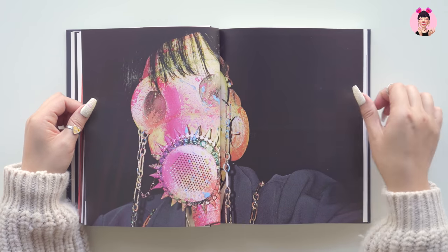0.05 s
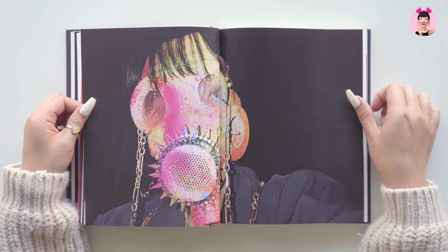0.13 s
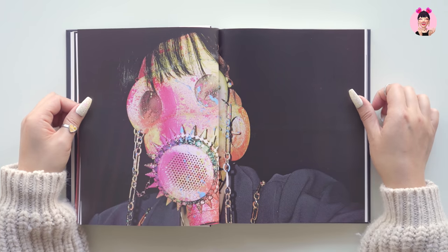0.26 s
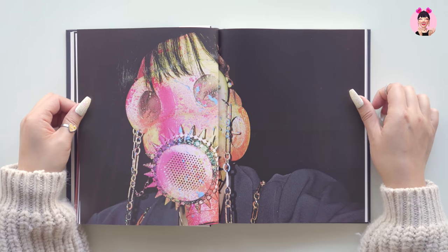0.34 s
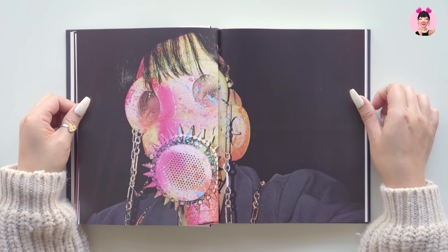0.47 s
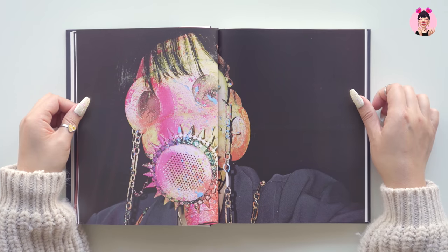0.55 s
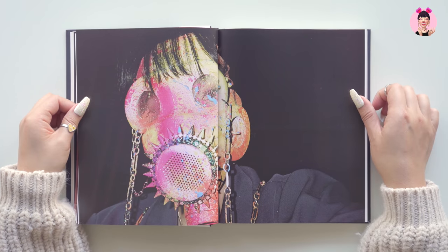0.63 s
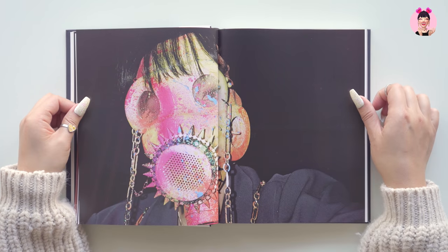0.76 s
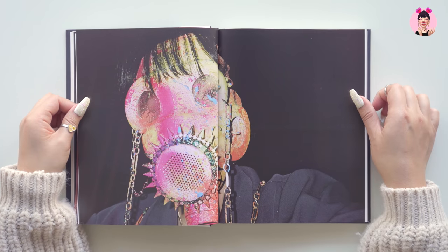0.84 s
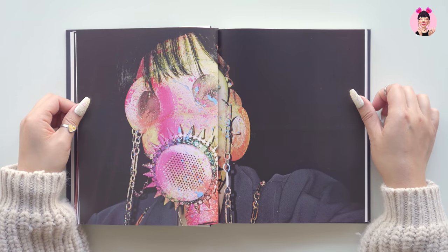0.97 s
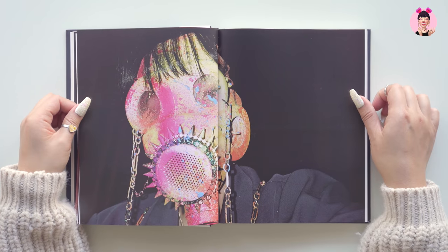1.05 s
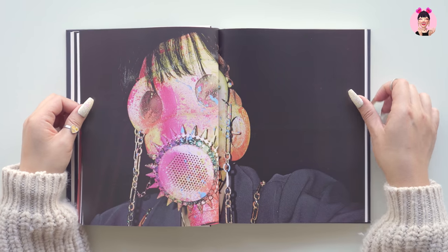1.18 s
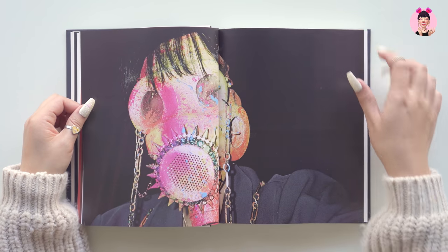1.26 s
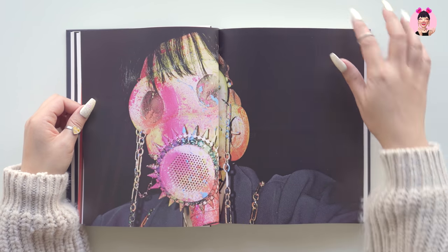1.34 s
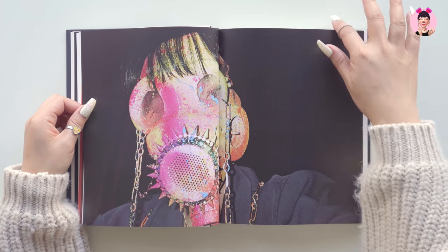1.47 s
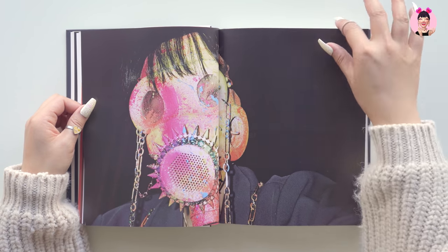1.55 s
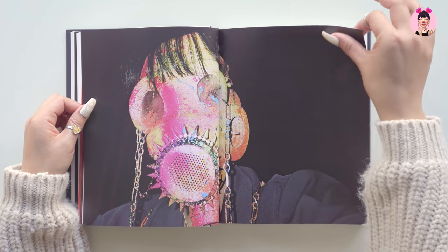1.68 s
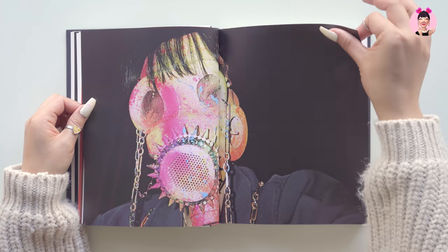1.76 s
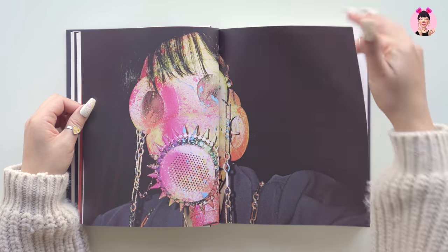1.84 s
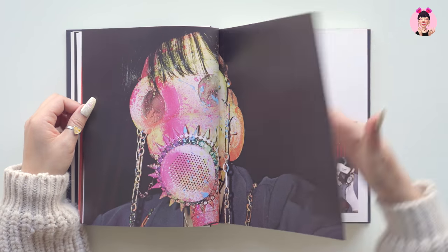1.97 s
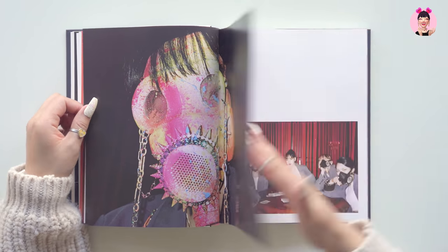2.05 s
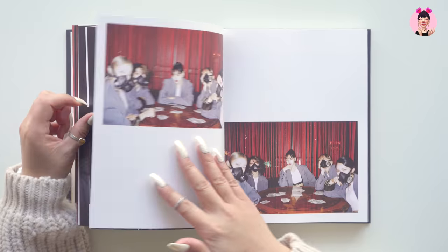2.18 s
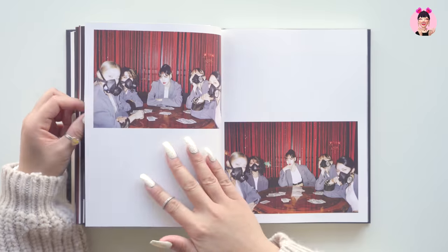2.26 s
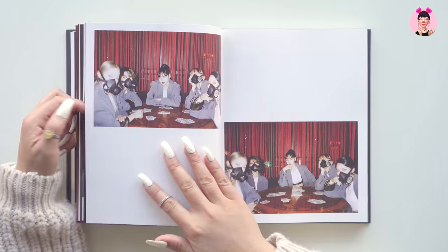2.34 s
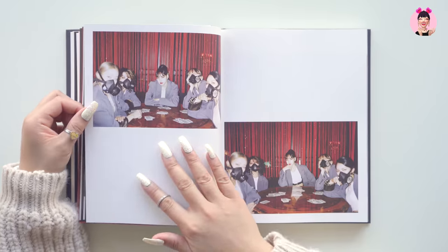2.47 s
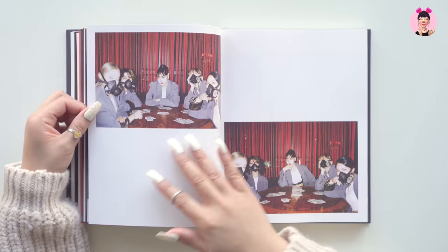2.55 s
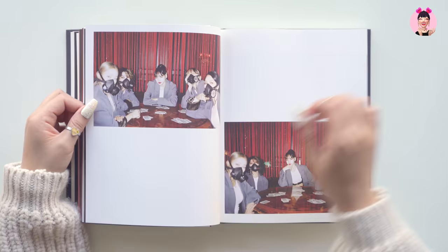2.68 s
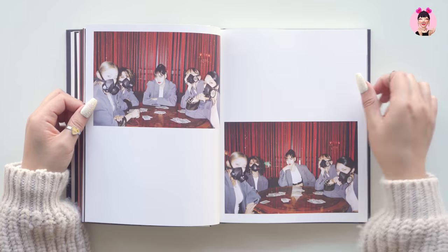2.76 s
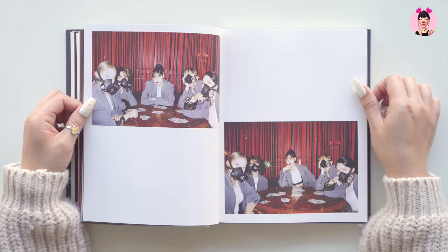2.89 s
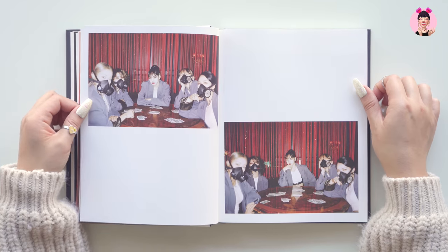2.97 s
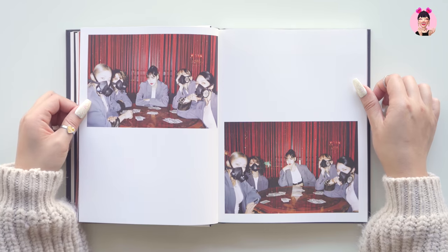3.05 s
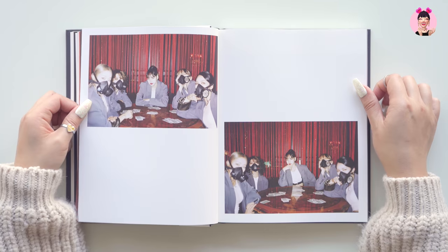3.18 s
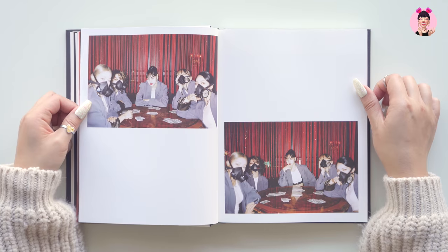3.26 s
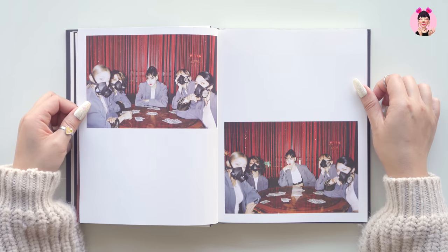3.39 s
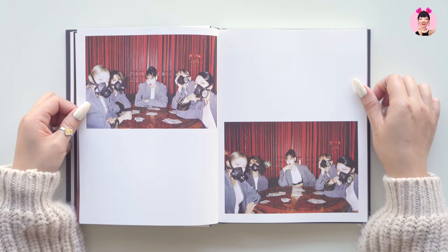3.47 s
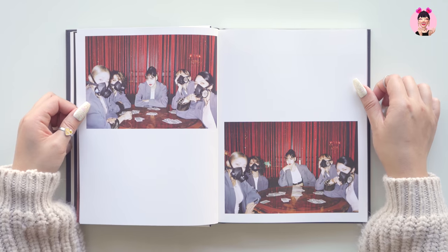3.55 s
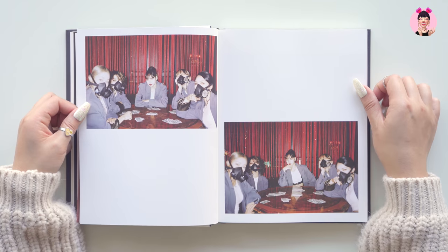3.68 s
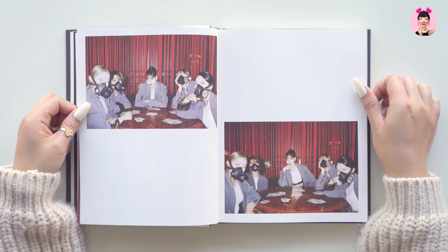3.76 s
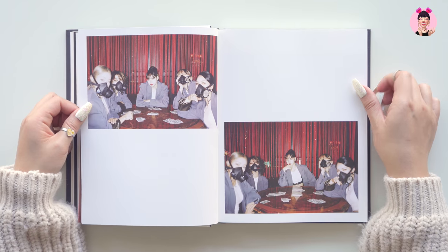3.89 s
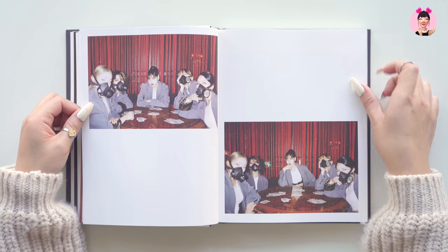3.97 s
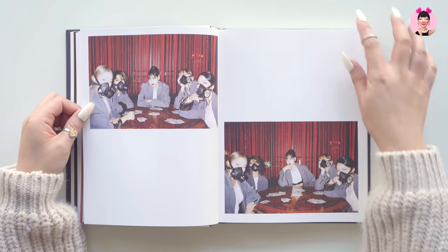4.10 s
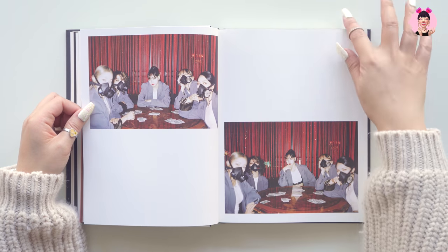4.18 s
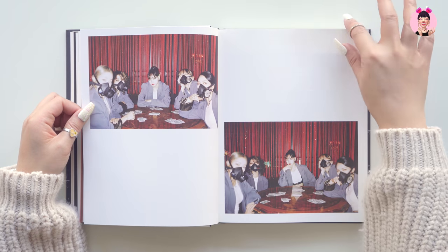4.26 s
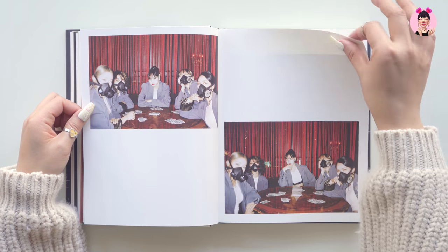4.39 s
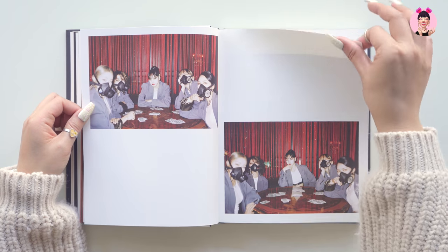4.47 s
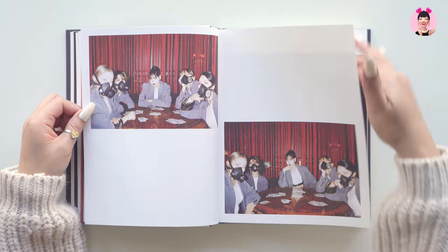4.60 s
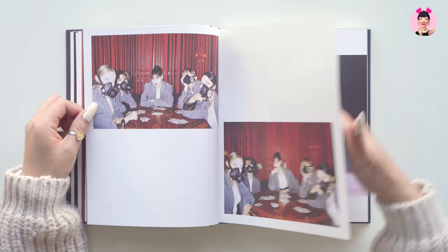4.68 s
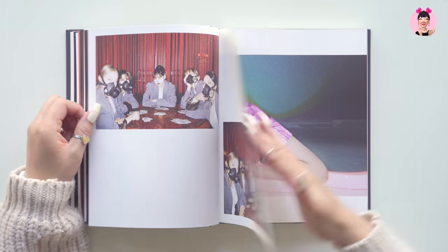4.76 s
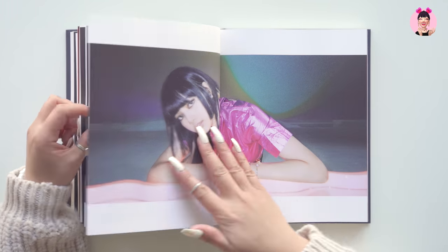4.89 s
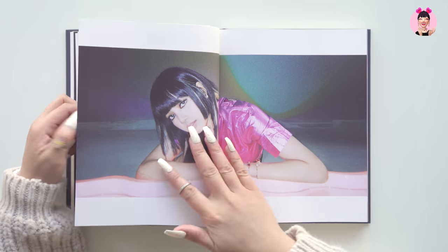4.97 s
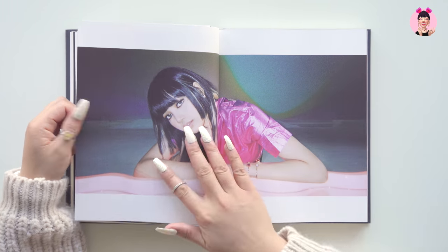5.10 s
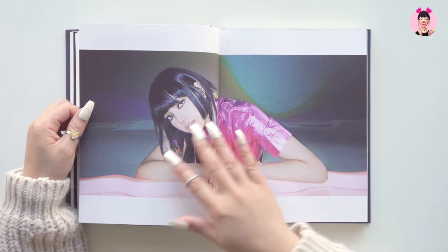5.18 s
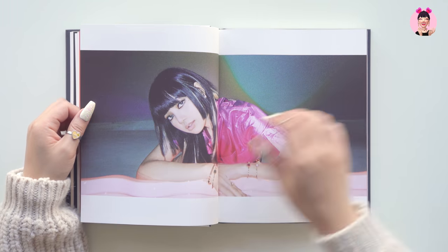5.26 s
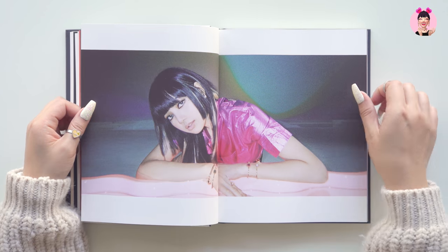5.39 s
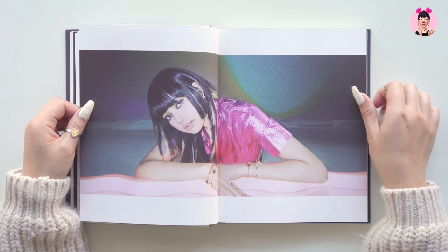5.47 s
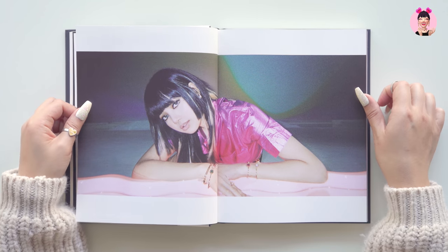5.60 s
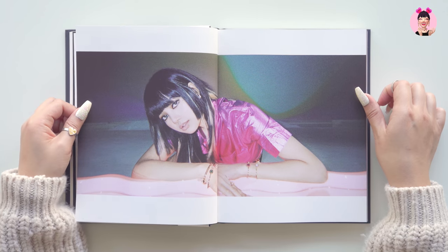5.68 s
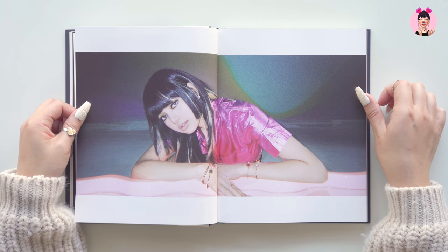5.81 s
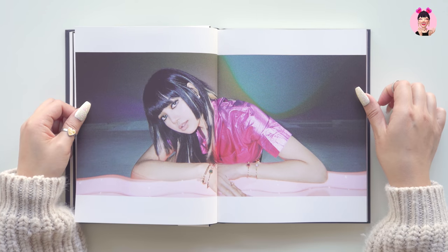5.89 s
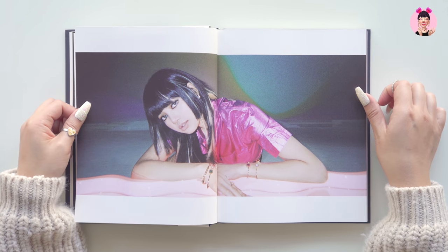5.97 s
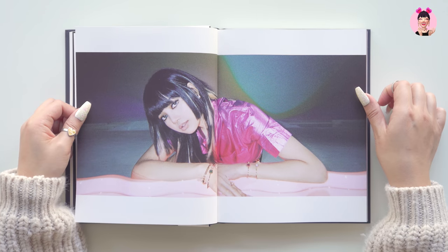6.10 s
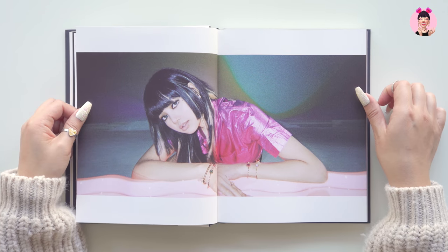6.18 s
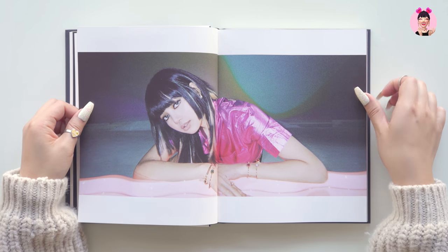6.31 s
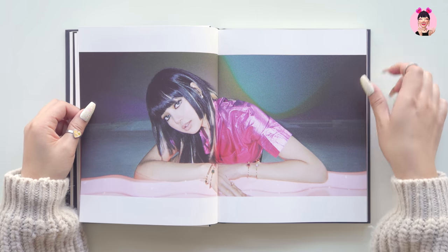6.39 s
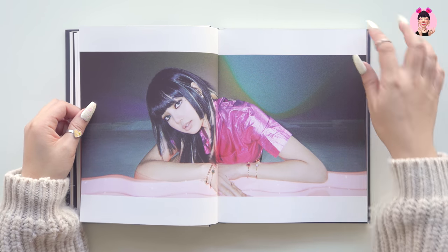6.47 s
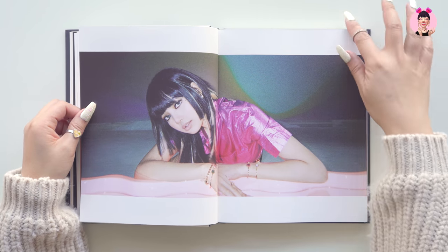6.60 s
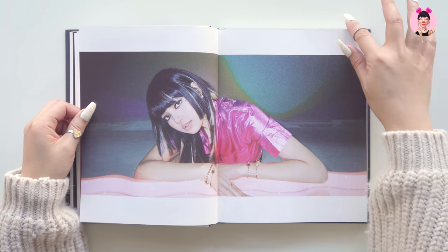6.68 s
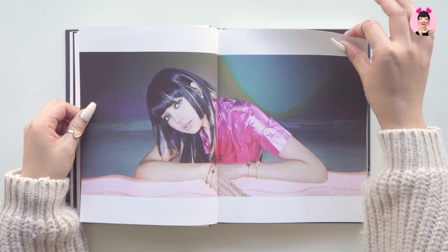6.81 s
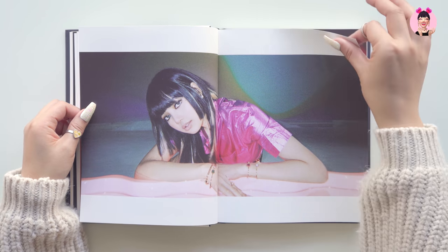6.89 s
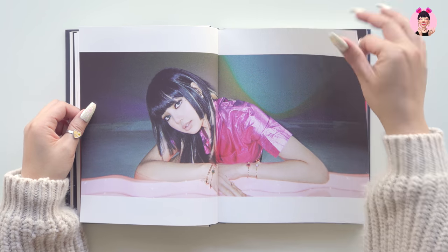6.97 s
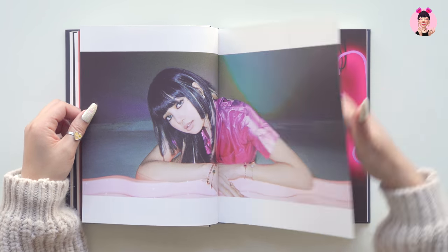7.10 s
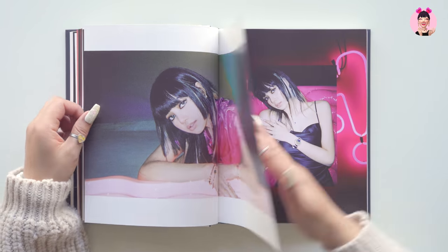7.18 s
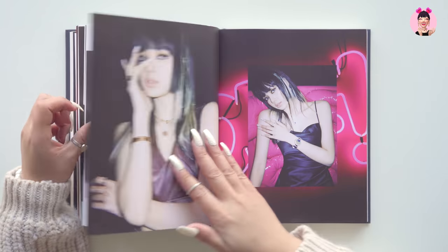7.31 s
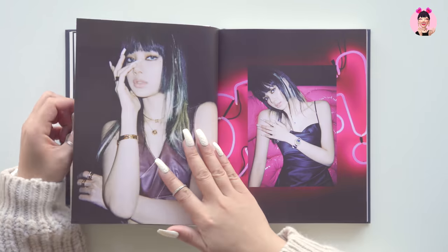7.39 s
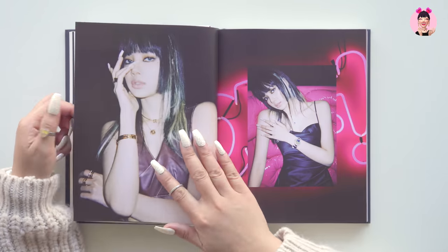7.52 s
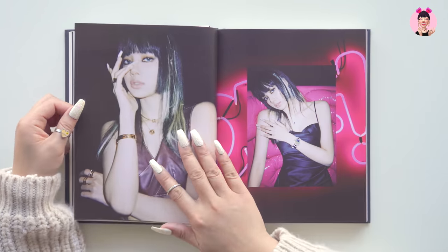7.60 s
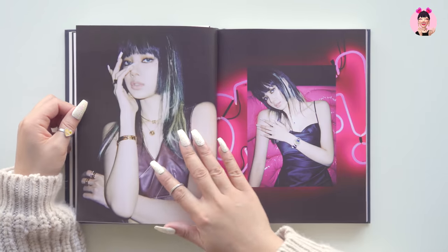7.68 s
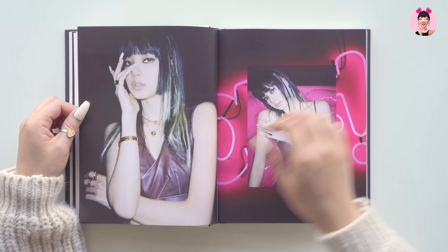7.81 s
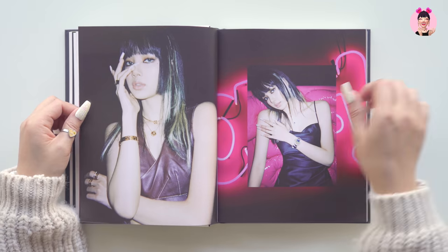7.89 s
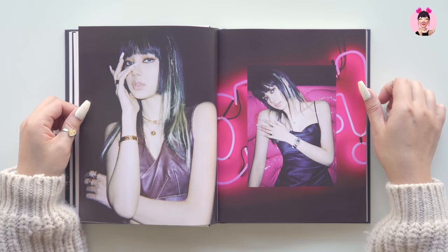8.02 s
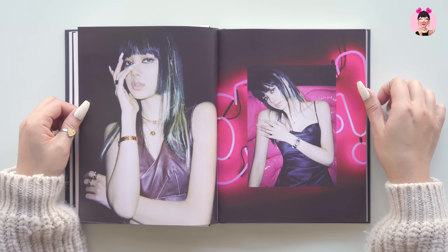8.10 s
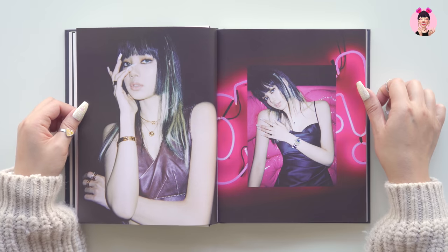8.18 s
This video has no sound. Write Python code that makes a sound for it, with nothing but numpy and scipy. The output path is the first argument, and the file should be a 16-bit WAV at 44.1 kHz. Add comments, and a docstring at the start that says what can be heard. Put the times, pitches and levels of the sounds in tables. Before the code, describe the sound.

Stiff glossy pages of a thick book are turned three times, with crisp snaps, papery swishes and hollow flaps over faint low room rumble.

```python
"""Thick book, stiff pages

A hand turns the stiff glossy pages of a thick book on a desk, close by in a quiet room.
Skin and sheets slide (noise strokes), corners snap (spike, ringing modes, noise trail), sheets flap hollowly
and the thumb hisses (short bursts); sleeves rustle. Behind: drifting rumble, wavering hum, bass swells, hiss."""
import sys
import numpy as np
from scipy import signal
from scipy.fft import rfft, irfft
from scipy.io import wavfile
from scipy.ndimage import uniform_filter1d

SR = 44100
rng = np.random.default_rng(int(sys.argv[2]) if len(sys.argv) > 2 else 0)


def write(x):
    x = np.atleast_2d(x).T
    wavfile.write(sys.argv[1], SR, np.round(np.clip(x, -1, 1) * 32767).astype(np.int16))

N = 363825
TIME_S = np.arange(N) / SR

# room noise spectrum: f/Hz, relative density/dB
ROOM_SPECTRUM = [(12, -39), (20, -0.5), (63, -7.5), (79, -17), (93, -13), (123, -8.5), (210, -25),
                 (241, -19.5), (270, -25.5), (347, -27), (513, -33), (607, -29.5), (678, -37), (10500, -49),
                 (16000, -48)]
# wavering hum lines: f/Hz, bandwidth/Hz, level before drift/dB
HUM_LINES = [(65, 11.9, -49.5), (122.6, 19, -60)]
# drift of the rumble: t/s, bass gain/dB, low-middle gain/dB
RUMBLE_DRIFT = [(0, 6.5, 9), (.7, 2.5, 11.5), (1.4, 5.5, 7.5), (2.6, 7, 6), (3.2, 2, 8), (3.8, 2.5, 3.5),
                (5.4, 4, 6), (6, 1, 3), (8.25, 1.5, 6.5)]
# soft bass swells: middle t/s, half-length/s, f/Hz, level before tone/noise mix/dB
BASS_SWELLS = [(.96, .35, 45, -38.5), (1.23, .3, 62.75, -35.5), (1.75, .14, 66.8, -29.5),
               (2.02, .2, 44.6, -37), (2.16, .2, 60.9, -30), (2.71, .3, 62.5, -35)]
# hand on the move, sleeves and skin rustle: start t/s, end t/s, level/dB
HAND_MOVES = [(0, .25, -69), (1.15, 1.61, -67.5), (2.3, 3.27, -69), (3.89, 4.4, -68.5), (5.0, 5.61, -67),
              (6.29, 6.85, -70), (7.5, 8.033, -68.5)]
# thumb hiss at the page corner before it lifts: middle t/s, half-length/s, f/Hz, level/dB
THUMB_HISSES = [(1.665, 0.071, 7800, -45), (4.39, 0.05, 7760, -51.5), (5.308, 0.053, 4400, -52.5),
                (6.87, 0.051, 7900, -57)]
# bent sheet over trapped air: middle t/s, half-length/s, f/Hz, level before tone/noise mix/dB
SHEET_FLAPS = [(1.853, 0.022, 942, -23), (4.6, 0.022, 987, -28), (4.975, 0.026, 571, -27),
               (5.0, 0.015, 897, -33.5), (7.028, .006, 1040, -21.5), (7.058, .006, 1250, -18.5),
               (7.335, .03, 550, -42.5), (7.465, 0.019, 524, -30.5), (7.517, 0.031, 581, -32.5)]
# colour of paper noise: f/Hz, relative density/dB
PAPER_SPECTRUM = [(180, -36), (300, -4.5), (462, -9), (656, -0.5), (870, -2.5), (1040, -1), (1320, -4),
                  (1530, -4), (2610, -6), (3290, -2), (4230, -4.5), (6100, -17.5), (8090, -17.5),
                  (10600, -22), (16000, -31)]
# sheet modes: f before scatter/Hz, relative level before scatter/dB, t60 before cap and shortening/s
SHEET_MODES = [(510, -2.5, 0.026), (764, -25, 0.092), (964, -10, 0.055), (1750, -20, 0.0088),
               (2084, -2.5, 0.0053), (2930, -41, 0.016), (3370, -20, 0.013), (4250, -9, 0.033),
               (4460, -60, 0.03)]
# snaps and nail ticks: t/s, presence peak/dB, low middle (weight)/dB, body (thud)/dB, last two re presence peak
PAGE_SNAPS = [(0.2268, -25.5, -4, -35), (0.2358, -26, -8, -28), (.2734, -47, -26, -20),
              (0.28, -45, -26, -17), (1.2397, -34.5, -13, -31), (1.286, -53, -5, -14),
              (1.3236, -47.5, -1.5, -16), (1.444, -47.5, -9, -13), (1.5, -25, -18, -37),
              (1.5357, -30, -8, -36), (1.714, -23, -17, -14), (1.771, -16, -16, -12.5),
              (1.807, -18, -13.5, -6), (1.959, -21.5, -13, -12.5), (2.065, -29, -15, -16),
              (2.2541, -24, -13.5, -16), (2.2631, -34, -4, -5.5), (2.356, -42, -6.5, -19),
              (2.5534, -32.5, -33, -27), (2.748, -40, -24, -28), (2.8538, -46, -28, -12),
              (2.9622, -44.5, -14, -22), (2.978, -43.5, -21, -22), (3.2632, -53.5, 0, 3),
              (4.2518, -43, -24, -34), (4.5198, -24.5, -22, -6.5), (4.615, -27.5, -2, -10),
              (4.701, -30.5, -10.5, -19), (4.9275, -23, -14, -15.5), (5.128, -41, -7.5, -18),
              (5.1954, -44.5, -6, -14), (5.241, -33, -21, -28), (5.4231, -43.5, -11, -9),
              (6.386, -36, -24, -19.5), (6.875, -34, -18, -14), (6.9116, -20, -20, -20.5),
              (7.3803, -15, -7, -6), (7.4979, -42.5, -9, -3), (7.5826, -49, 3, 5),
              (7.7382, -44.5, -4.5, -20), (7.9376, -40.5, -13, -16)]
# skin or paper over paper: t/s, length/s, presence level before fade/dB,
# body (weight)/dB, air (speed)/dB, last two re presence
PAPER_STROKES = [(0.147, 0.025, -61, 6, -9), (.195, 0.023, -62.5, 13, -12),
                 (0.223, 0.032, -33.5, -5.5, -20), (0.248, .025, -64, -3, -1),
                 (0.314, 0.033, -68, 13.5, -11), (1.215, 0.043, -50.5, -3.5, -13),
                 (1.294, .025, -57.5, 0, -13), (1.481, 0.027, -39, -11, -26), (1.528, 0.014, -55, 5, -21),
                 (1.608, 0.1, -37, -11.5, -10), (1.704, 0.026, -45.5, -5, -10),
                 (1.737, 0.012, -39.5, -4, -10), (1.783, 0.047, -56.5, 13, -16),
                 (1.807, 0.128, -42, -12.5, -7), (1.916, 0.018, -30.5, -11, -11.5),
                 (1.966, 0.047, -42.5, -6, -13), (2.01, .065, -41.5, -4.5, -10.5),
                 (2.072, 0.049, -38.5, -6, -5), (2.121, 0.1, -48, -2, -12), (2.239, .04, -29.5, -16.5, -21),
                 (2.28, 0.029, -45.5, -7, -15), (2.33, 0.099, -61, 3.5, -5), (2.548, 0.045, -62.5, 8, -3),
                 (3.183, 0.095, -66, 2, -13), (3.897, 0.13, -70, -1, -10), (4.239, 0.017, -53, -21, -6),
                 (4.356, 0.065, -33.5, -23, -14), (4.433, 0.0065, -30, -30, -14.5),
                 (4.45, 0.064, -49.5, -2.5, -18), (4.486, .011, -25, -2.5, -9),
                 (4.495, 0.087, -31.5, -14.5, -7), (4.59, 0.06, -41.5, -7, -2.5),
                 (4.661, 0.021, -35.5, -10, 0.5), (4.694, 0.12, -39.5, -8, -20),
                 (4.784, 0.083, -34, -11.5, -12), (4.853, 0.059, -48.5, -7, -5.5),
                 (4.926, 0.031, -32.5, -8.5, -11.5), (4.959, .012, -44, 3, -9),
                 (4.992, .015, -39, -2.5, -15.5), (5.016, 0.012, -52.5, 8, -5),
                 (5.046, 0.053, -68, 9.5, -1), (5.279, 0.047, -51, -24, -8.5),
                 (5.353, .027, -56.5, -27, -11), (5.42, 0.028, -69.5, 12, -12), (5.535, 0.073, -63, 4, -3),
                 (6.826, 0.045, -31, -18.5, -14.5), (6.881, 0.025, -43, -11, -13),
                 (6.917, 0.11, -33.5, -9, -10.5), (7.013, 0.11, -45, -3.5, -3.5),
                 (7.112, 0.029, -22.5, -23, -24.5), (7.131, 0.1, -40.5, -4.5, -20),
                 (7.211, 0.1, -43, -11, -10.5), (7.318, 0.047, -49, -7, -1.5),
                 (7.391, 0.042, -52.5, -1.5, -1.5), (7.448, .034, -57, 10.5, -4),
                 (7.545, 0.05, -59, -12, -16), (7.702, 0.043, -62.5, 1, -6)]
# crossovers body | low middle | presence | air: f/Hz
BAND_EDGES_HZ = (1000, 2300, 5500)

ROOM_LEVEL_DB = -50  # before drift
MOVE_EDGE_S = 0.05
# fainter snaps ring shorter and hold a larger share of air; the hardest crack brightly
SNAP_AIR_DB, SNAP_AIR_PER_DB, SNAP_AIR_T60_S = -39.5, -0.33, 0.064  # t60 of the extra air decay, hard snaps
SNAP_HARD_DB, SNAP_SHORTER_PER_DB, SNAP_CRACK_PER_DB = -25.5, 0.14, 1.22
SNAP_LEAD_S = 0.003
# weight also lifts the low middle, less than the body
STROKE_LOW_DB, STROKE_LOW_PER_DB = 3, 0.69
# all strokes fade a little, those above the firm level more
STROKE_FADE_DB, STROKE_FIRM_DB, STROKE_FADE_PER_DB = -1.5, -41.5, 0.86
STROKE_ATTACK_SHARE, STROKE_RELEASE_S = 0.083, 0.0064  # attack constant as a share of length
TOP_HZ = 15650


def undb(db):
    """dB to amplitude."""
    return 10 ** (np.asarray(db) / 20)


def unit(x):
    """Scale to RMS 1."""
    return x / np.sqrt(np.mean(x ** 2))


def tint(x, points):
    """Filter x by a spectrum of f/Hz, gain/dB points, straight in log frequency."""
    hz, db = np.transpose(points)
    f_hz = np.maximum(np.fft.rfftfreq(len(x), 1 / SR), 1)
    gain = undb(np.interp(np.log(f_hz), np.log(hz), db))
    return irfft(rfft(x) * gain, len(x))


def lowpass(x, order, hz):
    """Zero-phase Butterworth low-pass."""
    return signal.sosfiltfilt(signal.butter(order, hz, fs=SR, output="sos"), x)


def bands(x):
    """Split without delay into body, low middle, presence and air."""
    below = [lowpass(x, 3, hz) for hz in BAND_EDGES_HZ]
    return below[0], below[1] - below[0], below[2] - below[1], x - below[2]


def ring(x, hz, width_hz):
    """One resonance, gain 1 at its centre."""
    return signal.lfilter(*signal.iirpeak(hz, hz / width_hz, SR), x)


def walk(rate_hz):
    """Random levels of RMS 1, held 1 / rate_hz and slewed twice."""
    hold = int(SR / rate_hz)
    steps = np.repeat(rng.standard_normal(N // hold + 1), hold)
    slewed = uniform_filter1d(uniform_filter1d(steps, hold), hold)
    return unit(slewed[:N])


def add(into, start_s, sound):
    """Mix sound into a track from start_s, cut at the track's end."""
    i = int(start_s * SR)
    into[i:i + len(sound)] += sound[:len(into) - i]


def bursts(table, tone, width, glide):
    """Soft-edged bursts that sag from f(1 + glide) to f(1 - glide): tone share, rest resonant noise."""
    out = np.zeros(N)
    for middle_s, half_s, hz, db in table:
        u = np.linspace(-1, 1, int(2 * half_s * SR))
        phase = 2 * np.pi * np.cumsum(hz * (1 - glide * u)) / SR
        note = np.sqrt(2) * np.sin(phase)
        once = ring(rng.standard_normal(len(u)), hz, hz * width)
        noise = unit(ring(once, hz, hz * width))
        envelope = undb(db) * np.exp(-6 * u ** 2)
        add(out, middle_s - half_s, envelope * (tone * note + (1 - tone) * noise))
    return out


def room():
    """Rumble and hiss as shaped noise; bass and low middle drift, narrow-band noise makes wavering hum."""
    t_s, bass_db, low_db = np.transpose(RUMBLE_DRIFT)
    noise = unit(tint(rng.standard_normal(N), ROOM_SPECTRUM)) * undb(ROOM_LEVEL_DB)
    bass = lowpass(noise, 2, 110)
    low = lowpass(noise, 1, 1800) - bass
    hiss = noise - bass - low
    hum = sum(undb(db) * unit(ring(rng.standard_normal(N), hz, width_hz)) for hz, width_hz, db in HUM_LINES)
    bass_gain = undb(np.interp(TIME_S, t_s, bass_db))
    low_gain = undb(np.interp(TIME_S, t_s, low_db))
    return (bass + hum) * bass_gain + low * low_gain + hiss


def swells():
    """Soft bass notes, mostly tone, sagging slightly."""
    return bursts(BASS_SWELLS, tone=0.73, width=0.55, glide=0.046)


def sleeves():
    """Sleeves and skin rustle faintly while the hand moves: gated paper noise of uneven level."""
    gate = sum(undb(db) * ((TIME_S > start_s) & (TIME_S < end_s)) for start_s, end_s, db in HAND_MOVES)
    gain = uniform_filter1d(gate, int(MOVE_EDGE_S * SR), mode="nearest")
    brush = ring(tint(rng.standard_normal(N), PAPER_SPECTRUM), 3300, 2800)
    return unit(brush) * gain * undb(0.32 * walk(21))


def thumb():
    """Thumb hiss at the page corner: resonant noise without tone."""
    return bursts(THUMB_HISSES, tone=0, width=0.3, glide=0)


def flaps():
    """A bent sheet flaps over trapped air: hollow, sagging note in broad noise."""
    return bursts(SHEET_FLAPS, tone=0.45, width=1.0, glide=0.11)


def snaps():
    """A spike of suction and sheet modes, detuned anew each time; scattered noise trails it."""
    out = np.zeros(N)
    t = np.arange(int(0.12 * SR)) / SR - SNAP_LEAD_S
    after = np.maximum(t - 0.0005, 0)
    hz, mode_db, t60_s = np.transpose(SHEET_MODES)[:, :, None]
    for start_s, peak_db, weight_db, thud_db in PAGE_SNAPS:
        level_chance, pitch_chance = rng.standard_normal((2, len(SHEET_MODES), 1))
        # to be divided by a t60
        damp_db = -60 * after * undb(SNAP_SHORTER_PER_DB * max(SNAP_HARD_DB - peak_db, 0))
        mode_gain = undb(mode_db + 0.97 * level_chance)
        modes = mode_gain * np.sin(2 * np.pi * hz * (1 + 0.053 * pitch_chance) * after)
        ringing = (modes * undb(damp_db / np.minimum(t60_s, 0.08))).sum(axis=0)

        trail = unit(tint(rng.standard_normal(len(t)), PAPER_SPECTRUM))
        trail = trail * undb(damp_db / 0.04) * (1 - np.exp(-after / 0.00019))
        # heavy snaps have less of a clean spike
        spike = -np.exp(-np.abs(t - 0.0007) / 0.00007) * undb(-1.3 * max(weight_db + 14, 0))

        mix = undb(-4) * ringing + undb(-4.5) * trail + undb(12.5) * spike
        body, low, presence, air = bands(mix)
        air = air * undb(damp_db / SNAP_AIR_T60_S)
        crack_db = SNAP_CRACK_PER_DB * max(peak_db - SNAP_HARD_DB, 0)
        air_db = SNAP_AIR_DB + SNAP_AIR_PER_DB * peak_db + crack_db
        sound = presence / np.abs(presence).max()
        # other bands: RMS over 10 ms around the onset
        near = np.abs(t - 0.003) < 0.005
        for band, db in ((body, thud_db), (low, weight_db), (air, air_db)):
            sound = sound + undb(db) * band / np.sqrt(np.mean(band[near] ** 2))
        add(out, start_s - SNAP_LEAD_S, undb(peak_db) * sound)
    return out


def friction(grit_db, slip_db, patch_db):
    """Dense micro-slips of uneven size in the colour of paper; the grip keeps changing."""
    slips = rng.standard_normal(N) * undb(grit_db * np.minimum(rng.exponential(size=N), 5))
    # a fibre or a fold cracks, 300 per s on average
    slips = slips * (1 + undb(11) * (rng.random(N) < 300 / SR))
    spectrum = rfft(tint(slips, PAPER_SPECTRUM))
    octave = np.log2(np.maximum(np.fft.rfftfreq(N, 1 / SR), 1))
    # the bending sheet favours now one patch of resonances, now another
    sheet, step_octaves = 0, 0.4
    for centre in np.arange(7, 14.6, step_octaves):
        share = np.maximum(1 - np.abs(octave - centre) / step_octaves, 0)
        sheet = sheet + irfft(spectrum * share, N) * undb(patch_db * walk(45))
    gripped = sheet * undb(slip_db * walk(150))
    return [unit(band) for band in bands(gripped)]


def strokes():
    """Friction under quick-starting, quick-stopping envelopes; weight sets the lows, speed the highs."""
    power = np.zeros((5, N))
    for start_s, length_s, db, weight_db, speed_db in PAPER_STROKES:
        t = np.arange(int((length_s + 8 * STROKE_RELEASE_S) * SR)) / SR
        fade_db = STROKE_FADE_DB - STROKE_FADE_PER_DB * max(db - STROKE_FIRM_DB, 0)
        attack = 1 - np.exp(-t / (STROKE_ATTACK_SHARE * length_s))
        release = np.exp(-np.maximum(t - length_s, 0) / STROKE_RELEASE_S)
        shape = undb(db + fade_db * np.minimum(t / length_s, 1)) * attack * release

        low_db = STROKE_LOW_DB + STROKE_LOW_PER_DB * weight_db
        # a slow stroke also loses the top of its presence
        edge_db = np.clip(1.3 * (speed_db + 11), -20, 2)
        for row, share_db in zip(power, (weight_db, low_db, 0, edge_db, speed_db)):
            add(row, start_s, (shape * undb(share_db)) ** 2)
    power = uniform_filter1d(power, int(0.003 * SR))
    gains = np.sqrt(np.maximum(power, 0))

    body, low, presence, air = friction(grit_db=1.5, slip_db=1.5, patch_db=3.0)
    under = lowpass(presence, 6, 3900)
    edge = presence - under
    return sum(gain * band for gain, band in zip(gains, (body, low, under, edge, air)))


def reflections(paper):
    """The walls return a faint, dull tail: decaying resonant noise, t60 0.12 s, from 4 ms on."""
    t = np.arange(int(0.3 * SR)) / SR
    tail = ring(rng.standard_normal(len(t)), 540, 3400) * undb(-60 * t / 0.12) * (t > 0.004)
    tail = tail / np.sqrt(np.sum(tail ** 2))
    return undb(-20) * signal.fftconvolve(paper, tail)[:N]


def scene():
    """Background plus paper sounds with their reflections, one channel."""
    background = room() + swells() + sleeves()
    paper = thumb() + flaps() + snaps() + strokes()
    return (background + paper + reflections(paper))[None]


def record(dry):
    """Steep elliptic low-pass cuts the top."""
    return signal.sosfilt(signal.ellip(10, 0.2, 70, TOP_HZ, fs=SR, output="sos"), dry)


dry = scene()
out = record(dry)
write(out)
```